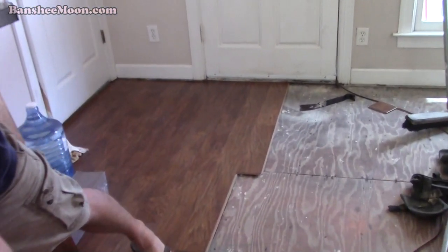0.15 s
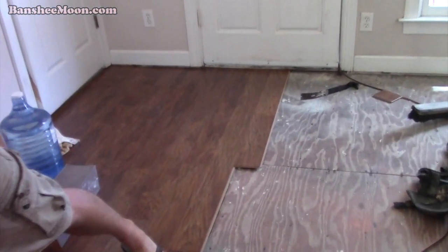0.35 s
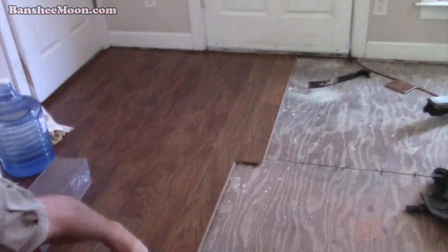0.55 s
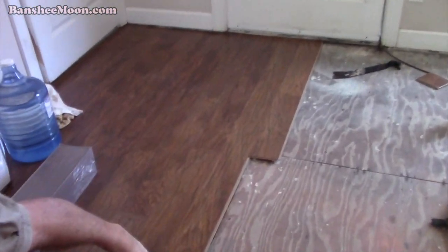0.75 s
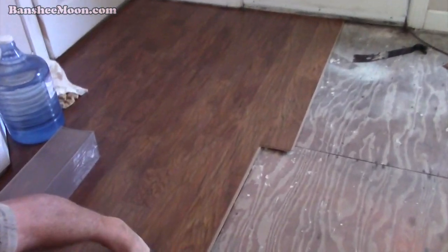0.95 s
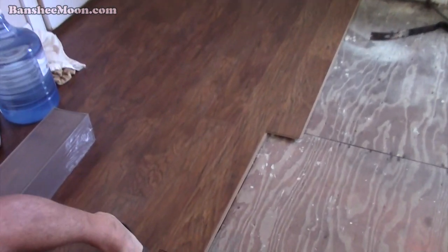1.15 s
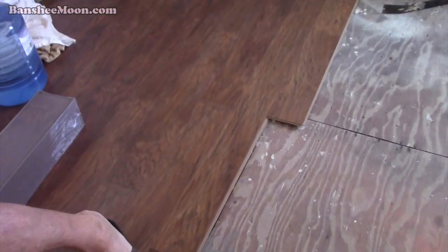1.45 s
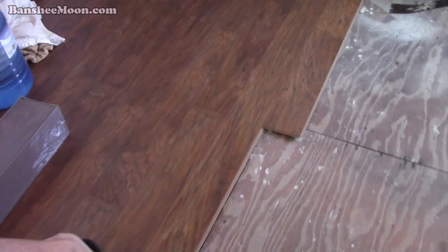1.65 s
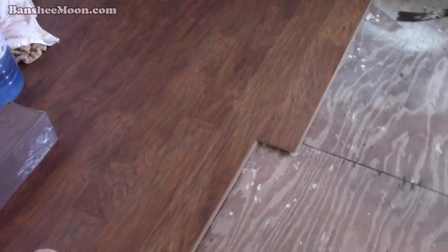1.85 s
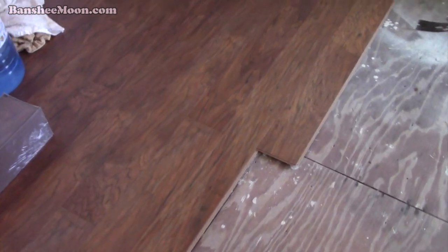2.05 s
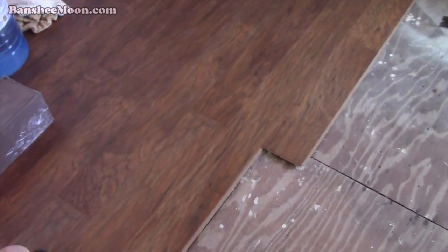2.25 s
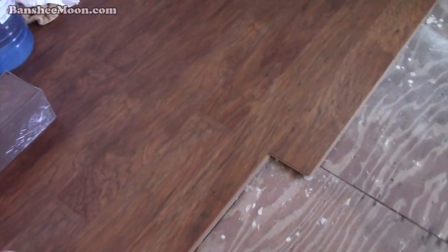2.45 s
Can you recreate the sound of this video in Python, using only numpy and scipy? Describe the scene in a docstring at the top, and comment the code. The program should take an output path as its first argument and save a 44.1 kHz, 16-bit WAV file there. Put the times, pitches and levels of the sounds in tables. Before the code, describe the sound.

A rubber mallet knocks a floor plank through a tapping block: blows near 0.1, 0.5, 0.9, 1.4, 1.75, 2.15 and 2.5 seconds. Dull block touches precede the first, second and fourth; the fourth is weak, the last two hard and bright. Brief joint squeaks follow early blows. Soft high swishes of mallet fill fall between. Bare-room ring, faint air, close microphone slightly overloaded.

```python
"""A soft, high swish of loose fill in a mallet head, over the faint tone of a bare room, then seven blows.
A rubber mallet knocks a floor plank home through a tapping block, which touches the plank before some blows.
Clicks, knocks and the room are banded decaying noise; plank, thump and block ping are decaying sines.
Brief pitched noise bursts are the joint slipping. The fourth blow is weak, the last two hard and bright
as the joint closes; the nearby microphone overloads a little: limiter and soft clip."""
import sys
import numpy as np
from scipy import signal
from scipy.fft import irfft
from scipy.io import wavfile
from scipy.ndimage import uniform_filter1d

SR = 44100
rng = np.random.default_rng(int(sys.argv[2]) if len(sys.argv) > 2 else 0)


def digitize_waveform(pressure):
    """Quantize a signal to 16-bit integers and store it at the path in sys.argv[1].

    Rows of a 2-D input are taken as channels; values are limited to [-1, 1].
    """
    field = np.atleast_2d(pressure).T
    bounded = np.clip(field, -1, 1)
    quanta = np.round(bounded * 32767).astype(np.int16)
    wavfile.write(sys.argv[1], SR, quanta)


N = 114660

# Steady air spectrum: freq_hz, density_db_per_hz
AIR_SPECTRUM = [(30, -59), (120, -4.5), (300, 0.5), (700, -8), (2000, -10), (5000, -22), (10000, -31),
                (15000, -36)]
# Fill shifting as the mallet swings, lands and lifts: start_s, length_s, level_db
RUSTLES = [(0.03, 0.23, -57.5), (0.386, 0.094, -47.5), (0.797, 0.12, -58.5), (0.993, 0.16, -58),
           (1.336, 0.072, -56), (1.393, 0.019, -47.5), (1.608, .04, -59.5), (1.698, 0.055, -52.5),
           (1.758, 0.0095, -38), (2.08, 0.077, -49), (2.448, 0.21, -52.5)]
# Fill spectrum: freq_hz, density_db_per_hz
RUSTLE_SPECTRUM = [(800, -5), (2500, -0.5), (5000, 4), (7500, -3), (9000, -5), (10200, 4.5), (11500, -8.5),
                   (14000, -8), (16000, -24)]
# Joint slipping just after a blow: start_s, level_db, pitch_hz
SLIPS = [(0.117, -37.5, 9000), (0.134, -26.5, 6400), (.502, -28, 3500), (0.9007, -20.5, 3620),
         (1.3961, -31, 3240)]
# Block meeting plank before a blow: start_s, level_db, click_db (before level_db), tilt_db_per_octave
TOUCHES = [(0.0728, -16, -9, -15), (0.1025, -20, 4, 0), (.476, -0.5, 2.5, -5), (1.3664, -14, -2, -2)]
# Dull colour of the touches: gain_db at each COLOUR_HZ
TOUCH_COLOUR_DB = [0.5, -1, -1.5, 4, -22.5, -24]
# Mallet blows: start_s, boom_db, thud_db, knock_db, clap_db, crack_db, snap_db (the six at COLOUR_HZ),
# click_db, thump_hz, thump_db, ping_hz, ping_db
BLOWS = [(0.1139, 2.5, 0, 1, 1, 4, 1.5, -2, 334, -6, 1664, 3),
         (0.488, -1, 0.5, 2.5, -1, -1, -1, -2.5, 328, -3.5, 2280, 0),
         (0.8893, -0.5, -1.5, 4, 1, 1, 1.5, -4, 370.6, -7.5, 2556, -5),
         (1.385, 1, -6.5, -5.5, -14, -11.5, -13, -6, 303, -18.5, 5160, -21),
         (1.7597, 6.5, 3.5, 1, -0.5, -1, -5.5, -4.5, 316, -5.5, 3280, -15.5),
         (2.1436, 4, 4, 2, 6, 2, 4, -1, 479, -7.5, 2510, -5),
         (2.5237, 2.5, -3.5, -0.5, 5.5, 7.5, 10.5, 0, 475, -14, 6100, 4.5)]
# Colour points of an impact: freq_hz
COLOUR_HZ = [170, 270, 370, 600, 2000, 7000]
# Plank and subfloor modes: freq_hz, level_db (before colour), t60_s
PLANK_MODES = [(177.9, -25, 0.27), (268.3, -18, 0.4), (273.4, -16.5, 0.48), (341, -23.5, 0.65),
               (368.7, -18, 0.53), (433.7, -14, 0.17), (523, -27.5, 0.33), (528.4, -26, 0.49),
               (625, -28, 0.62), (1306, -28, 0.18), (1546, -31, 0.13), (2300, -55, 0.042),
               (2980, -38, 0.19)]
# Close block modes: ratio to ping_hz
PING_RATIOS = [.92, 1, 1.09]
# Spectra of contact click, board knock and room: freq_hz, density_db_per_hz
CONTACT_SPECTRUM = [(100, -79), (300, 7.5), (600, 3), (1100, 0), (1700, -3), (2600, -3), (4200, -11),
                    (6500, -14), (10000, -22), (16000, -31)]
BODY_SPECTRUM = [(30, -60), (80, -88), (130, -63.5), (190, 1.5), (280, -10.5), (420, -1), (650, -12),
                 (1000, -24.5), (1600, -22.5), (3600, -24.5), (5000, -41), (15000, -60.5)]
ROOM_SPECTRUM = [(30, -70), (80, -36), (135, -15), (165, -8.5), (215, -5), (270, 3), (355, -1.5), (430, -4),
                 (700, -11), (1080, -18.5), (1570, -20), (3500, -25), (4500, -29), (6800, -35.5),
                 (10000, -46.5), (15000, -59.5)]
# Their decays: freq_hz, t60_s
CONTACT_T60 = [(300, 0.073), (2000, 0.011), (6000, 0.029), (12000, 0.0053)]
BODY_T60 = [(60, 0.033), (300, 0.1), (1000, 0.15), (5000, 0.13)]
ROOM_T60 = [(100, 0.44), (280, 0.56), (700, 0.65), (1800, 0.72), (4500, 0.64), (8000, 0.54), (14000, 0.42)]
# Stereo width of all noise: freq_hz, side_minus_mid_db
SIDE_DB = [(100, -38.5), (500, -27.5), (1400, -22), (3000, -16.5), (6000, -15.5), (12000, -18.5)]
# Stereo balance of all noise: freq_hz, left_minus_right_db
BALANCE_DB = [(300, -0.37), (1500, 0), (5000, 0.1), (9000, 0.5)]

AIR_DB, EARLIER_BLOW_DB = -55, -45.5
RUSTLE_FADE_S = 0.033  # amplitude time constant
SLIP_WIDTH_OCTAVES, SLIP_PEAK_S = 0.14, 0.0019
CONTACT_DB, BODY_DB, ROOM_DB = -7.5, -8.5, -13.5
CONTACT_RISE_S, BODY_RISE_S, ROOM_RISE_S, MODE_RISE_S = 0.00015, 0.0048, 0.0086, 0.004  # time constants
CEILING_DELAY_S, CEILING_DB = 0.0089, -11.5  # echo level relative to the click
FLUTTER_DB, FLUTTER_STEP_S = 0.37, 0.004  # standard deviation, spacing
TOUCH_DAMP_S = 0.06  # time constant
THUMP_PEAK_S = 0.0079
PING_T60_CYCLES = 28
LIMIT_DBFS, RELEASE_DB_PER_S = 2, 313
CLIP_CEILING, CLIP_KNEE = 0.93, 4.0  # full scale = 1, exponent
LOW_CUT_HZ, HIGH_CUT_HZ = 83, 16000


def amp(db):
    """Decibels to gain."""
    return 10 ** (np.asarray(db) / 20)


def read(points, hz):
    """Interpolates a table along a log-frequency axis."""
    f, value = np.transpose(points)
    return np.interp(np.log(hz + 1), np.log(f + 1), value)


def add(mix, start_s, sound):
    """Mixes a sound in at a time, cut at the end of the mix."""
    part = mix[:, round(start_s * SR):][:, :sound.shape[-1]]
    part += sound[..., :part.shape[1]]


def decay(t, t60):
    """Exponential fall of 60 dB per t60, both in the same unit."""
    return np.exp(-np.log(1000) * t / t60)


def noise(spectrum, size, colour=((1, 0),)):
    """Spectrum of nearly mono, random-phase stereo noise; rms about 1 before colour."""
    hz = np.fft.rfftfreq(size, 1 / SR)
    mid, side = np.exp(2j * np.pi * rng.random((2, len(hz))))
    side = side * amp(read(SIDE_DB, hz))
    lean = amp(read(BALANCE_DB, hz) / 2)
    stereo = np.array([(mid + side) * lean, (mid - side) / lean])
    gain = amp(read(spectrum, hz))
    unit_rms = np.sqrt(size / np.mean(gain ** 2))
    return stereo * gain * unit_rms * amp(read(colour, hz))


def ring(spectrum, colour, rise_s, t60, size):
    """Countless overlapping modes: noise bands that swell, then die each at its own rate."""
    t = np.arange(size) / SR
    hz = np.fft.rfftfreq(size, 1 / SR)
    centres_hz = np.geomspace(60, 15000, 14)
    source = noise(spectrum, size, colour)
    out = np.zeros((2, size))
    for centre_hz, pick in zip(centres_hz, np.eye(len(centres_hz))):
        # triangular band on the log-frequency axis
        weight = np.interp(np.log(hz + 1), np.log(centres_hz), pick)
        band = irfft(source * weight, size)
        shape = (1 - np.exp(-t / rise_s)) * decay(t, read(t60, centre_hz))
        shaped = band * shape
        # even out the chance level of noise under a short envelope
        even = np.sqrt(np.mean(band ** 2) * np.mean(shape ** 2) / np.mean(shaped ** 2))
        out += shaped * even
    return out


def room_tone():
    """Quiet air as steady noise, plus the dying ring of an earlier blow."""
    out = amp(AIR_DB) * irfft(noise(AIR_SPECTRUM, N), N)
    tail = ring(AIR_SPECTRUM, [(1, 0)], CONTACT_RISE_S, ROOM_T60, size=32768)
    add(out, 0, amp(EARLIER_BLOW_DB) * tail)
    return out


def rustles():
    """Loose mallet fill: high noise that swells early, then fades into the room."""
    out = np.zeros((2, N))
    t = np.arange(SR // 2) / SR
    fade = np.exp(-1 / (RUSTLE_FADE_S / 2 * SR))  # power falls twice as fast as amplitude
    for start_s, length_s, level_db in RUSTLES:
        arch = np.sin(np.pi * np.minimum(t / length_s, 1) ** 0.35) ** 2
        power = signal.lfilter([1], [1, -fade], arch ** 2)
        envelope = np.sqrt(power / power.max())
        swish = irfft(noise(RUSTLE_SPECTRUM, len(t)), len(t))
        add(out, start_s, amp(level_db) * envelope * swish)
    return out


def slips():
    """Tongue and groove give way: brief noise bursts with a resonant peak."""
    out, size = np.zeros((2, N)), 2048
    u = np.arange(size) / SR / SLIP_PEAK_S
    hz = np.fft.rfftfreq(size, 1 / SR)
    for start_s, level_db, pitch_hz in SLIPS:
        octaves_off = np.log2((hz + 1) / pitch_hz)
        band = 1 / (1 + (octaves_off / SLIP_WIDTH_OCTAVES) ** 2)
        crackle = irfft(noise([(1, 0)], size) * band, size)
        add(out, start_s, amp(level_db) * u * np.exp(1 - u) * crackle / crackle.std())
    return out


def thump(pitch_hz, level_db):
    """The loose plank flexes for a few cycles: a sine that swells and dies."""
    t = np.arange(SR // 4) / SR
    u = t / THUMP_PEAK_S
    return amp(level_db) * u * np.exp(1 - u) * np.sin(2 * np.pi * pitch_hz * t)


def ping(pitch_hz, level_db):
    """The block rings in close, beating modes; where the mallet lands sets the pitch."""
    cycles = pitch_hz * np.arange(SR // 20) / SR
    shape = (1 - np.exp(-cycles / 2)) * decay(cycles, PING_T60_CYCLES)
    modes = 0
    for k, ratio in enumerate(PING_RATIOS):
        modes = modes + (-1) ** k * np.sin(2 * np.pi * ratio * cycles)  # alternating sign
    return amp(level_db) * shape * modes / 2


def plank_modes(t, colour):
    """Plank and subfloor resonances: decaying sines, levelled by the impact's colour."""
    out = np.zeros(len(t))
    for freq_hz, level_db, t60_s in PLANK_MODES:
        shape = (1 - np.exp(-t / MODE_RISE_S)) * decay(t, t60_s)
        out += amp(level_db + read(colour, freq_hz)) * shape * np.sin(2 * np.pi * freq_hz * t)
    return out


def strike(colour_db, click_db):
    """One impact: room, contact click and its ceiling echo, board knock, plank modes."""
    colour = list(zip(COLOUR_HZ, colour_db))
    out = amp(ROOM_DB) * ring(ROOM_SPECTRUM, colour, ROOM_RISE_S, ROOM_T60, size=32768)
    t = np.arange(out.shape[1]) / SR
    # reflections arrive in uneven clumps
    clumps = rng.standard_normal(size=512)
    out *= amp(FLUTTER_DB * np.interp(t / FLUTTER_STEP_S, np.arange(len(clumps)), clumps))
    click = ring(CONTACT_SPECTRUM, colour, CONTACT_RISE_S, CONTACT_T60, size=4096)
    click *= amp(CONTACT_DB + click_db)
    add(out, 0, click)
    add(out, CEILING_DELAY_S, amp(CEILING_DB) * click)
    knock = ring(BODY_SPECTRUM, colour, BODY_RISE_S, BODY_T60, size=8192)
    add(out, 0, amp(BODY_DB) * knock)
    return out + plank_modes(t, colour)


def touches():
    """Block meets plank: dull strikes whose ring is shortened by an added fast decay."""
    out = np.zeros((2, N))
    octaves = np.clip(np.log2(np.array(COLOUR_HZ) / COLOUR_HZ[1]), -1, 1)
    for start_s, level_db, click_db, tilt_db_per_octave in TOUCHES:
        touch = strike(TOUCH_COLOUR_DB + tilt_db_per_octave * octaves, click_db)
        damp = np.exp(-np.arange(touch.shape[1]) / SR / TOUCH_DAMP_S)
        add(out, start_s, amp(level_db) * touch * damp)
    return out


def blows():
    """Mallet on block: each blow strikes the boards, flexes the plank and pings the block."""
    out = np.zeros((2, N))
    for start_s, *colour_db, click_db, thump_hz, thump_db, ping_hz, ping_db in BLOWS:
        add(out, start_s, strike(colour_db, click_db))
        add(out, start_s, thump(thump_hz, thump_db))
        add(out, start_s, ping(ping_hz, ping_db))
    return out


def scene():
    """Sum of all that reaches the microphone."""
    return room_tone() + rustles() + slips() + touches() + blows()


def record(dry):
    """Overloaded microphone: quick limiter, soft clip, low cut, band limit."""
    level_db = 20 * np.log10(abs(dry).max(0) + 1e-9)
    over_db = np.maximum(level_db - LIMIT_DBFS, 0)
    # peak hold with a linear dB release
    fall_db = np.arange(N) * RELEASE_DB_PER_S / SR
    hold_db = np.maximum.accumulate(over_db + fall_db) - fall_db
    held = dry / amp(uniform_filter1d(hold_db, size=128))
    rounded = held / (1 + abs(held / CLIP_CEILING) ** CLIP_KNEE) ** (1 / CLIP_KNEE)
    low_cut = signal.butter(2, LOW_CUT_HZ, "highpass", fs=SR, output="sos")
    cut = signal.sosfilt(low_cut, rounded)
    band_limit = signal.firwin(511, HIGH_CUT_HZ, window=("kaiser", 9), fs=SR)
    return signal.oaconvolve(cut, band_limit[None], "same")


dry = scene()
out = record(dry)
digitize_waveform(out)
```